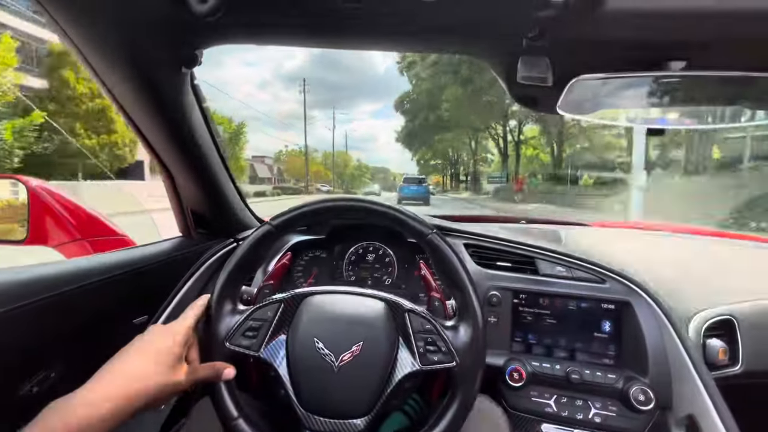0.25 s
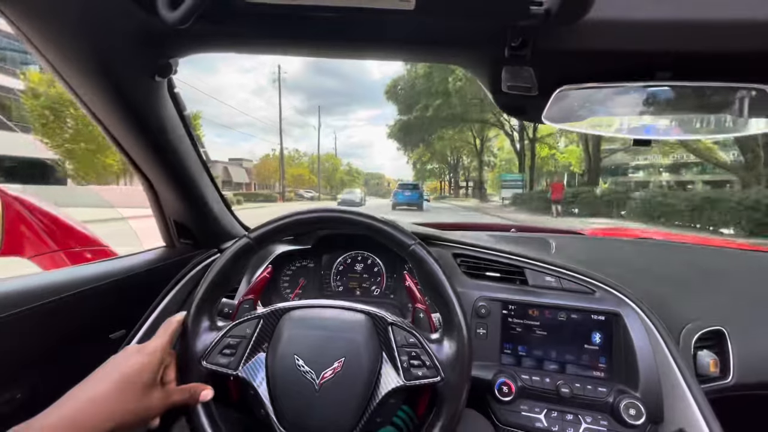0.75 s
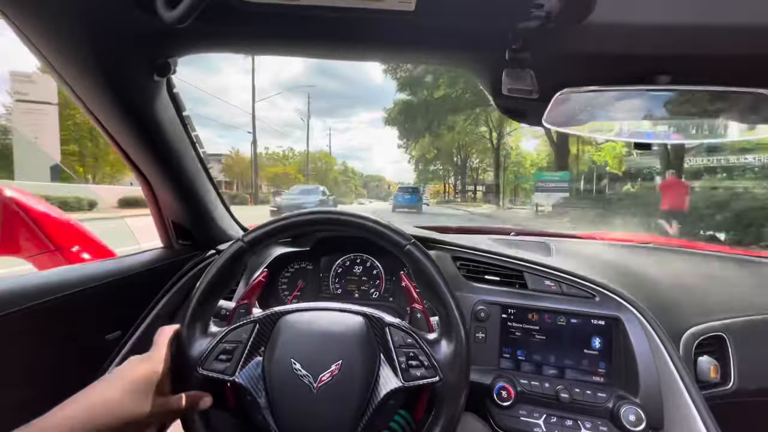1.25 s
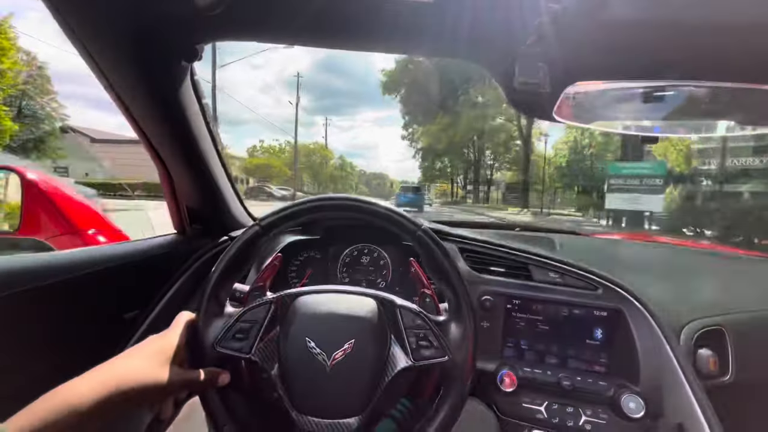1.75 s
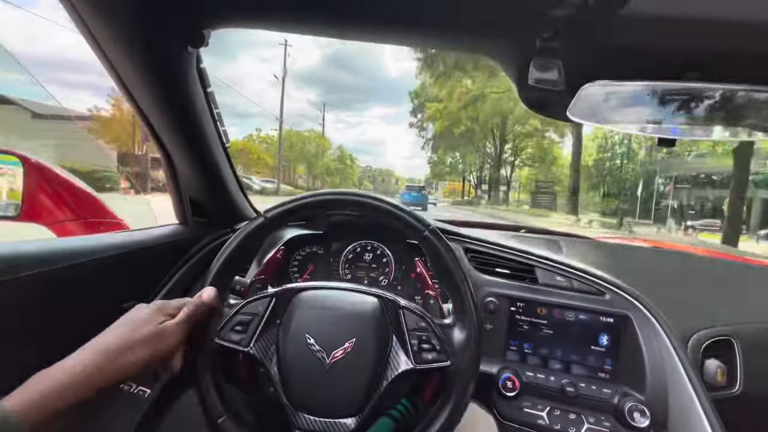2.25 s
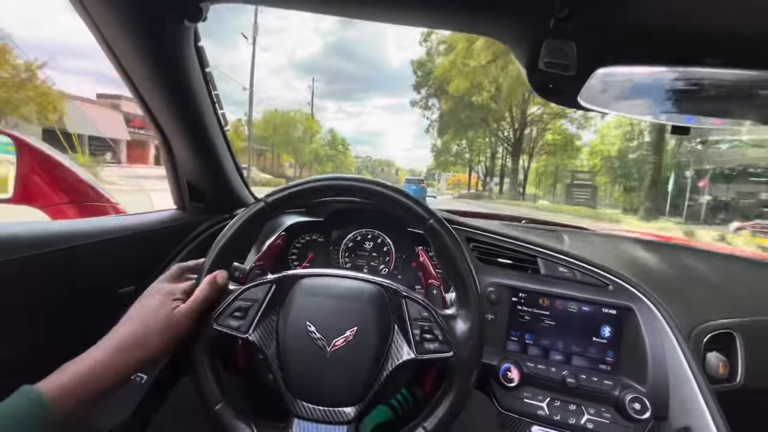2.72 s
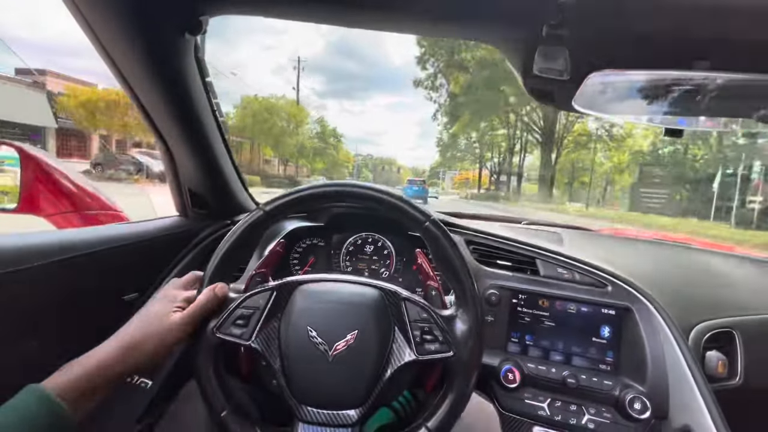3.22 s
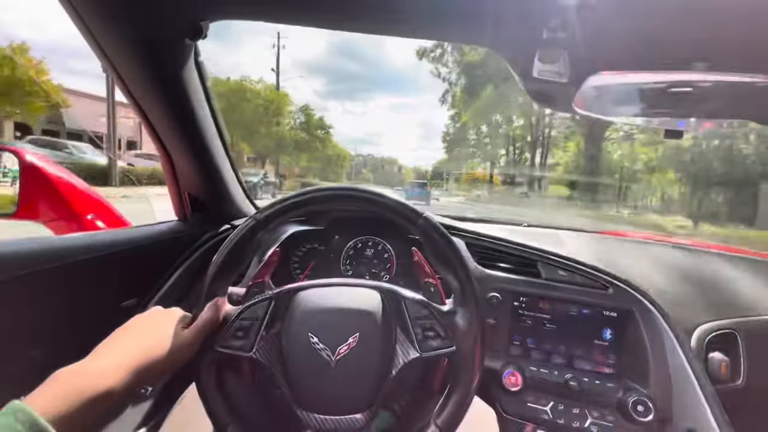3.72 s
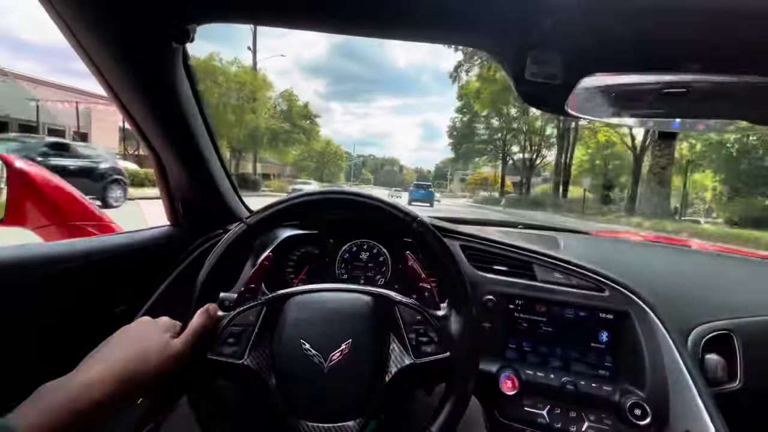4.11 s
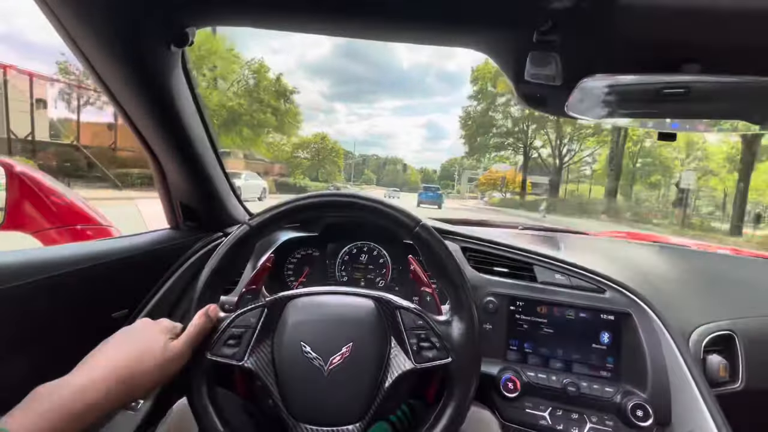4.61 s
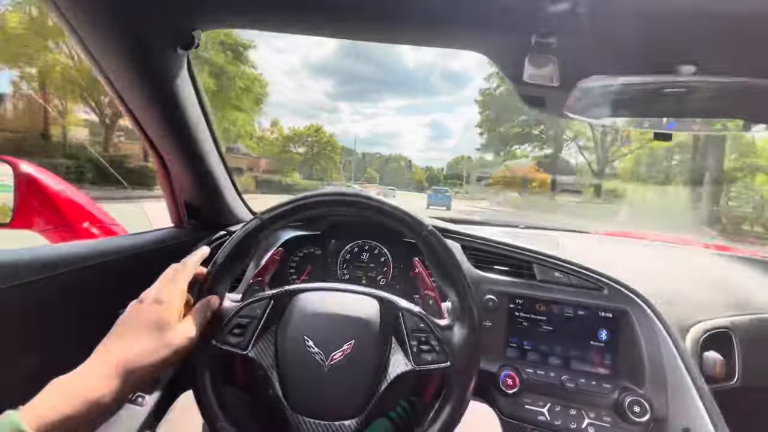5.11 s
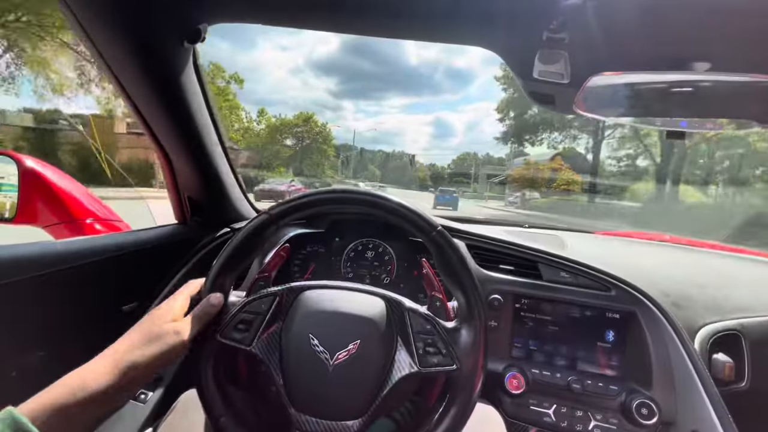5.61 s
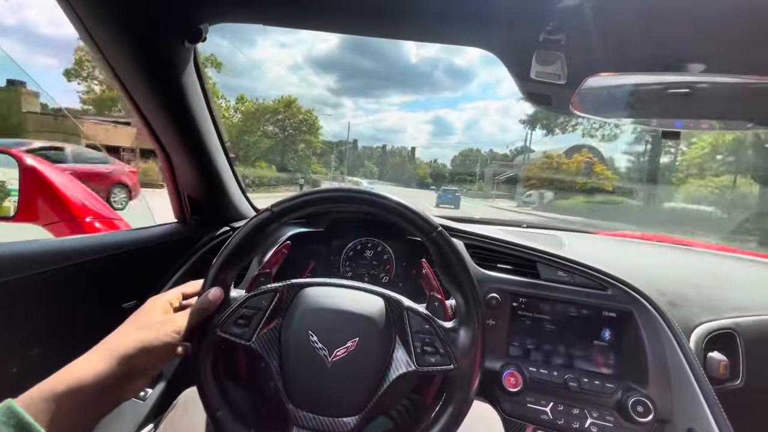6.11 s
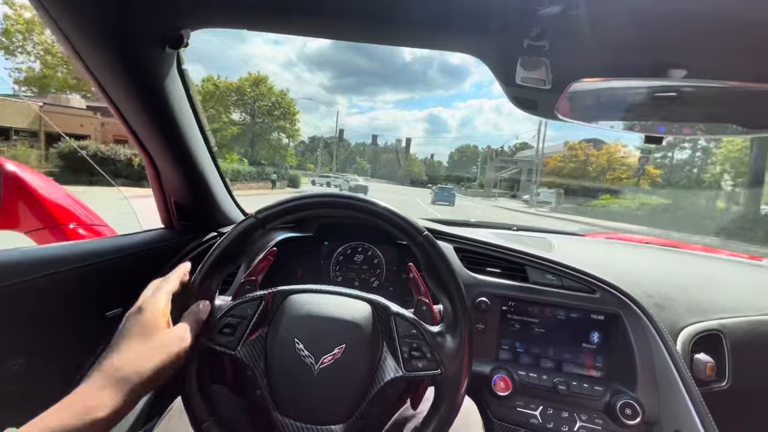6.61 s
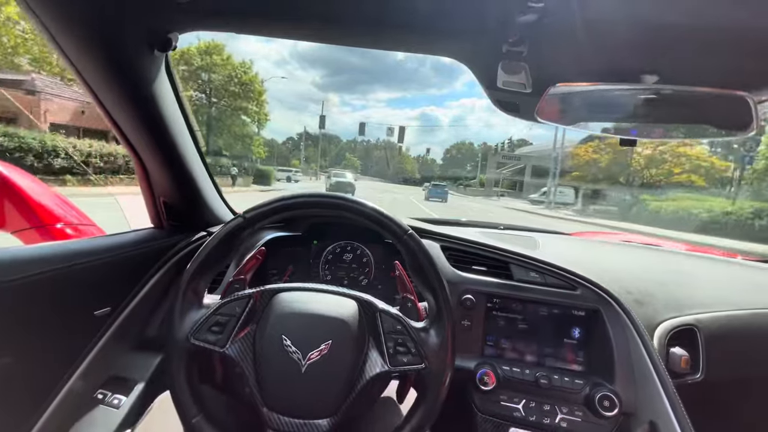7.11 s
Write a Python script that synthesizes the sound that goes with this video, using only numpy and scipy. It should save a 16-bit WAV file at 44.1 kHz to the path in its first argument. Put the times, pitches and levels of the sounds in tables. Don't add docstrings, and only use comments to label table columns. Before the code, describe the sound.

Inside a moving V8 car with loud exhaust: steady low drone, lift-off burble and pops, then a sharp throttle-blip bark near the end.

```python
import sys
import numpy as np
from scipy import signal
from scipy.fft import rfft, irfft
from scipy.io import wavfile
from scipy.ndimage import uniform_filter1d, minimum_filter1d

SR = 44100
rng = np.random.default_rng(int(sys.argv[2]) if len(sys.argv) > 2 else 0)


def gain_from_decibels(decibels):
    exponent = np.asarray(decibels, float) / 20
    return 10 ** exponent


def waveform_to_disk(signal):
    frames = np.transpose(np.atleast_2d(signal))
    scaled = np.clip(frames, -1, 1) * 32767
    samples = np.round(scaled).astype(np.int16)
    wavfile.write(sys.argv[1], SR, samples)


N = 324127
PORT_LEAD, PORT_TOP_HZ = 21, 7800


def level(x, db):
    return x * gain_from_decibels(db) / np.sqrt(np.mean(x ** 2))


def curves(table):
    s, *columns = np.transpose(table)
    return [np.interp(np.arange(N) / SR, s, c) for c in columns]


def lowpass(x, hz, order):
    return signal.sosfilt(signal.butter(order, hz, fs=SR, output="sos"), x)


def band(x, hz, width_hz):
    warm = min(6645, x.shape[-1])
    primed = np.concatenate([x[..., :warm], x], axis=-1)
    return signal.lfilter(*signal.iirpeak(hz, hz / width_hz, fs=SR), primed)[..., warm:]


def walk(rate):
    k = int(SR / rate)
    held = np.repeat(rng.standard_normal(N // k + 1), k)
    return 1.3 * uniform_filter1d(uniform_filter1d(held, k), k)[:N]


def steady(x, span_s, share):
    k = int(span_s * SR)
    power = x.var(axis=0) + x.mean(axis=0) ** 2
    slow_power = uniform_filter1d(uniform_filter1d(power, k), k)
    return x / (slow_power + 0.0091 * x.var()) ** (np.clip(share, 0, 1) / 2)


def noise(colour, flicker_db, rate, turn=0.):
    hz, sum_db, diff_db = np.transpose(colour)
    bins = np.fft.rfftfreq(N, 1 / SR)
    f = np.log(bins + 1)
    both, apart = (
        rfft(rng.standard_normal(N)) * gain_from_decibels(np.interp(f, np.log(hz), db, -99, -99))
        for db in (sum_db, diff_db))
    lead = np.exp(1j * (turn + 2 * np.pi * bins * PORT_LEAD / SR * (bins < PORT_TOP_HZ)))
    left, right = (both + apart) * lead, both - apart
    centres = np.linspace(np.log(hz[0]), np.log(hz[-1]), 5)
    out = 0
    for centre in centres:
        patch = np.clip(1 - abs(f - centre) / (centres[1] - centres[0]), 0, 1)
        out = out + gain_from_decibels(flicker_db * walk(rate)) * irfft([patch * left, patch * right], N)
    return out / np.sqrt(np.mean(out.mean(axis=0) ** 2))


def spells(rows, floor, rise_s, fall_s):
    t = np.arange(N) / SR
    power = floor ** 2
    for s, length, db in rows:
        rise, fall = (t - s) / rise_s + .5, (s + length - t) / fall_s + .5
        power = power + (gain_from_decibels(db) * np.clip(np.minimum(rise, fall), 0, 1)) ** 2
    return np.sqrt(power)


def burst(s, t60, rise_s):
    i = int(s * SR)
    t = np.arange(min(int(.15 * SR), N - i)) / SR
    return i, (1 - np.exp(-t / rise_s)) * 1000. ** (-t / max(t60, .01))


def pan(db, pan_db):
    return gain_from_decibels(db + np.array([[pan_db], [-pan_db]]) / 2)


# pitch_hz, ear_sum_db per Hz, ear_difference_db per Hz
RUMBLE_COLOUR = [(14, -33, -47), (24, -19.5, -29), (40, -4.5, -22), (56.7, 3.5, -24), (70, -44, -23),
                 (110, -20, -26)]
ROAR_COLOUR = [(294, 2, -20), (472, 10.5, -9.5), (690, 0.5, -1.5), (1104, -0.5, -3.5), (1384, -7, -11.5),
               (1633, -10.5, -11), (2100, -27.5, -23), (2610, -34.5, -37.5)]
HISS_COLOUR = [(1660, 1, -7), (2200, 4, 1), (3200, -2, -1.5), (4200, -9, -4.5), (4940, -31.5, -24)]
SWISH_COLOUR = [(3620, -5.5, -17), (4500, -2.5, -5.5), (5720, 0, -3.5), (6750, -8.5, -6),
                (8260, -11.5, -12), (8900, -5, -14), (9640, -12, -3), (9750, -28, -2), (10200, -26, -1),
                (10930, -11, -7.5), (11200, -12.5, -15), (12000, -14.5, -24.5), (12250, -16, -25.5),
                (12500, -44.5, -47.5)]
# closest_s, width_s, level_db, brightness_db
SWELLS = [(.15, 0.052, -83, 2), (0.951, 0.28, -54.5, -8), (1.84, 0.1, -49.5, -1.5), (1.7, 0.5, -57.5, -5),
          (2.49, 0.11, -42, -7), (2.68, 0.19, -51.5, -6), (3.8, 0.15, -55.5, -15), (4.15, 0.17, -53.5, -6),
          (4.9, 0.36, -56.5, -5.5), (6.2, 0.29, -52, -16.5), (6.84, 0.12, -49.5, -3.5),
          (6.97, 0.06, -44.5, -8), (7.09, 0.057, -55, 4.5)]
# start_s, length_s, level_db
BUMPS = [
    (0, 0.27, -17),
    (.72, 0.56, -22),
    (1.46, 0.1, -22),
    (2.37, 0.37, -15.5),
    (5.2, 0.14, -21),
    (5.52, 0.089, -18),
    (5.9, 0.13, -23),
    (6.53, 0.12, -19),
]


def road():
    t = np.arange(N) / SR
    coast_from_s, brake_from_s, brake_fade = 1.4, 5.76, 6.5
    slowing = np.maximum(t - coast_from_s, 0) + brake_fade * np.maximum(t - brake_from_s, 0)
    near = np.array([gain_from_decibels(db) * np.exp(-.5 * ((t - s) / width) ** 2) for s, width, db, _ in SWELLS])
    swelling = np.sqrt(np.sum(near ** 2, axis=0))
    bright = np.sqrt(gain_from_decibels(2 * np.array(SWELLS)[:, 3]) @ near ** 2)

    bumps = spells(BUMPS, gain_from_decibels(-22.5 - .5 * slowing), rise_s=.04, fall_s=.08)
    body = steady(noise(RUMBLE_COLOUR, flicker_db=.6, rate=8, turn=-.75), span_s=.12, share=.8)
    rumble = gain_from_decibels(-2.2) * bumps * body
    roar_gain = np.hypot(gain_from_decibels(-31 - 0.55 * slowing), gain_from_decibels(13) * swelling)
    roar = roar_gain * noise(ROAR_COLOUR, flicker_db=1.36, rate=22, turn=0.88)
    hiss = np.hypot(gain_from_decibels(-57.5), swelling) * noise(HISS_COLOUR, flicker_db=1.6, rate=21)
    swish = np.hypot(gain_from_decibels(-61), bright) * noise(SWISH_COLOUR, flicker_db=0.1, rate=16)
    return rumble + roar + hiss + swish


# start_s, peak_db, pitch_hz
SQUEAKS = [(2.463, -24, 1158), (2.488, -41, 3740), (2.586, -41, 3000), (2.603, -21, 1400),
           (2.562, -14, 514), (4.074, -40, 3244), (4.457, -45, 2450), (4.843, -52, 5200),
           (5.208, -42, 2495), (5.589, -51, 5280), (6.342, -48, 5327), (7.088, -43, 3290)]


def squeaks():
    out = np.zeros(N)
    for s, db, hz in SQUEAKS:
        i, env = burst(s, t60=.06, rise_s=.004)
        out[i:i + len(env)] += 2 * gain_from_decibels(db) * env * np.sin(2 * np.pi * hz * np.arange(len(env)) / SR)
    return np.array([gain_from_decibels(-3) * out, out])


# start_s, peak_db
CHATTER = [(0.038, -53), (.681, -50), (.734, -51), (0.782, -42.5), (.831, -44), (.884, -41.5), (.941, -50),
           (2.373, -46.5), (2.419, -50.5), (2.49, -52), (2.536, -39), (2.602, -36), (4.592, -51),
           (5.197, -51), (5.246, -49), (5.337, -50), (5.388, -47.5), (5.437, -47), (5.583, -49)]
# start_s, peak_db, brightness_db, left_minus_right_db
KNOCKS = [(1.164, -50, -21, -4), (1.206, -47, -11, -7), (2.444, -47, -8, -5), (2.757, -54, -11, 1),
          (3.237, -47.5, 6, -0.5), (3.249, -32, 4, 1), (3.267, -52.5, 7, -4), (3.707, -47, -18, 3),
          (3.859, -56, -7, -7), (4.11, -48.5, -2, -6.5), (4.456, -47.5, -20, 0), (4.666, -52, -21, 8),
          (4.734, -47, -8, -8), (4.836, -48, -4, -3), (4.915, -54, -18, -3), (5.093, -49, -15, 2.5),
          (5.958, -42.5, 5.5, 3.5), (6.062, -32, -9.5, -1), (6.072, -43.5, -18, -2), (6.334, -43, -14, -2),
          (6.589, -56, -2, -6), (6.62, -56.5, -6, -17), (6.715, -46, -17, -11), (7.091, -45, -23, -2)]


def ticks():
    rise_s = .003
    low = noise(HISS_COLOUR, flicker_db=1, rate=38)
    swish = noise(SWISH_COLOUR, flicker_db=1, rate=30)
    mid, top = (
        level(signal.sosfilt(signal.butter(4, PORT_TOP_HZ, kind, fs=SR, output="sos"), swish), 0)
        for kind in ("low", "high"))
    low = low + 0.8 * band(low, 3280, width_hz=230)

    # start, peak, mid dB, top dB, t60, left minus right dB
    rows = [(s, db, 1, -16, .05, -1) for s, db in CHATTER]
    rows += [(s, db, -3 + 0.47 * top_db, top_db, 0.048, pan_db) for s, db, top_db, pan_db in KNOCKS]
    out = np.zeros((2, N))
    for s, db, mid_db, top_db, t60, pan_db in rows:
        i, env = burst(s - rise_s / 2, t60, rise_s)
        span = slice(i, i + len(env))
        scratch = low[:, span] + gain_from_decibels(mid_db) * mid[:, span] + gain_from_decibels(top_db - 5.5) * top[:, span]
        out[:, span] += pan(db + 8.5, pan_db) * env * scratch
    return out


# start_s, length_s, level_db
OPEN_THROTTLE = [
    (6.71, 0.11, -22),
    (6.86, 0.026, -41),
    (6.91, 0.13, -31.5),
]


def blast():
    gain = spells(OPEN_THROTTLE, 0, rise_s=0.026, fall_s=.05)
    return gain * noise(ROAR_COLOUR, flicker_db=6, rate=67)


# start_s, peak_db, pitch_hz, left_minus_right_db
CRACKS = [(2.562, -18.5, 535, -5), (2.605, -17.5, 571, -4), (2.686, -17.5, 611, 13), (3.248, -21.5, 640, 6),
          (3.73, -13.5, 526, -3), (4.336, -22, 560, -3), (4.777, -19.5, 490, -0.5), (4.966, -18.5, 830, -1),
          (5.076, -29, 770, 3), (5.328, -26, 760, 7), (6.721, -20, 606, 8.5), (6.871, -28.5, 501, 3),
          (6.98, -24, 1050, -3)]


def cracks():
    out = np.zeros((2, N))
    for s, db, hz, pan_db in CRACKS:
        i, env = burst(s, t60=.11, rise_s=.001)
        pop = level(band(rng.standard_normal((2, len(env))), 0.68 * hz, hz), 0)
        out[:, i:i + len(env)] += pan(db + 1.0, pan_db) * env * pop
    return lowpass(out, 1500, order=4)


# start_s, length_s, level_db
LONG_FLAMES = [(2.424, 0.32, -18.5), (2.835, 0.057, -16.5), (3.298, .32, -14.5), (3.858, .12, -15),
               (4.028, 0.15, -16), (4.385, 0.54, -18.5), (4.9, .6, -15), (5.678, 0.24, -16.5),
               (5.982, 0.14, -18.5), (6.42, .2, -16), (6.912, 0.12, -21), (7.198, 0.13, -14.5)]
SHORT_FLAMES = [(2.3, 0.59, -14.5), (2.88, 0.12, -11.5), (3.06, .19, -13.5), (3.3, 0.25, -17),
                (3.66, .14, -9.5), (3.95, .2, -12.5), (4.2, .2, -13), (4.55, 0.22, -11.5), (4.81, 0.11, -9),
                (5.1, .4, -18), (5.55, 0.22, -12), (5.85, 0.31, -15.5), (6.2, 0.247, -12.5),
                (7.27, 0.11, -19)]
SMOULDER_DB = [-21, -20.5, -21.5, -36]


def flames(overrun):
    floors = [gain_from_decibels(db - 11 * (1 - overrun)) for db in SMOULDER_DB]
    rings = [[(s, .05, db + ring_db) for s, db, _, _ in CRACKS] for ring_db in (-1, -8)]
    groups = [LONG_FLAMES, SHORT_FLAMES, *rings]
    return [spells(rows, floor, rise_s=0.037, fall_s=0.014) for rows, floor in zip(groups, floors)]


def ears(right, left_db, sign):
    lag = 20
    return np.array([sign * gain_from_decibels(left_db) * np.roll(right, lag), right])


def pulses(hz, sizes):
    turns = np.cumsum(hz) / SR
    at = np.interp(np.arange(1, int(turns[-1])), turns, np.arange(N))
    i = at.astype(int)
    out = np.zeros(N + 1)
    size = sizes[:len(i)]
    out[i] += size * (1 - at + i)
    out[i + 1] += size * (at - i)
    return out[:N], i


# time_s, firing_rate_hz, overrun 0-1 (throttle shut), firing_level_db
ENGINE = [(0, 158.6, 0, -13), (.9, 163.6, 0.06, -13), (1.4, 160.3, 0.01, -14), (2.0, 157, 0.03, -12.5),
          (2.25, 153.8, 0.9, -12.5), (2.75, 144.5, .8, -16), (3.3, 137.8, 1, -21.5), (4.2, 131.2, 1, -23),
          (6.55, 117.1, 0.85, -19), (6.64, 121.7, 0.3, -15.5), (6.7, 140.8, 0, -12.5),
          (6.75, 151.6, .1, -6), (6.8, 163.3, 0, -1), (6.86, 178.4, 0.2, -9.5), (6.93, 191.6, 0.8, 0),
          (7.0, 197.7, 0.9, -8.5), (7.1, 203, 0.9, -18.5), (7.35, 197.1, 1, -22)]
CYLINDERS_DB = [-2.5, -5, 7.5, -2.5, -5, -.5, 1, -.5]
# pitch_hz, width_hz, firing_level_db, left_ear_db, left_ear_sign, polarity
PIPE = [(40.7, 42, -9, -6.5, 0.18, 1), (87.34, 10.3, 6.5, 1.5, 0.46, -1.38), (115, 21.4, 2, -6.5, 1, 1),
        (142.7, 17.34, 4.5, -1.5, 0.6, -1.734), (204.5, 13.2, 2.5, -9, 1, -0.92),
        (278, 20, -9.5, -3.5, 0.93, 0.81), (312.3, 13, -18.5, -34, 0.76, -1.4),
        (372.6, 45, -9.5, -5.5, -1.4, 0.82), (458, 150, -25, -11, 1, -1.7), (556, 110, -27, 0, -1.4, -0.7),
        (760, 950, -9.5, -2, 0.94, -0.31)]
BURBLE_GROUP = [-1, 0, 1, 1, 2, 2, 2, 3, 3, 3, -1]
BURBLE_DB = [0, 0, -12, -6, -0.5, -6, -9, 11, -13.5, 3.5, 0]
# pitch_hz, ear_sum_db per Hz, ear_difference_db per Hz
RASP_COLOUR = [(344, 0, -9), (700, 3.5, 4.5), (1290, -14, -8), (2500, -24.5, -24), (3970, -31.5, -32)]


def exhaust():
    hz, overrun, load_db = curves(ENGINE)
    overrun = np.clip(overrun, 0, 1)
    climb = uniform_filter1d(np.maximum(np.gradient(hz) * SR, 0), size=2205)
    imbalance = (1 - 0.82 * overrun) * np.exp(-(climb / 150) ** 2)
    scatter_db = 0.86 + 2.5 * overrun
    chance = rng.standard_normal((N // 100, 2)).T

    flare, at = pulses(hz, chance[1] * abs(chance[1]) ** .6)
    cylinder_db = imbalance[at] * np.resize(CYLINDERS_DB, len(at))
    sizes = gain_from_decibels(cylinder_db + scatter_db[at] * chance[0, :len(at)])
    wobble = 1 + .005 * scatter_db * walk(90)
    clicks = pulses(hz * wobble, np.append(sizes, sizes))[0]
    fire = clicks * gain_from_decibels(load_db) * SR / hz
    fire = lowpass(lowpass(fire, 230, order=2), 1300, order=4)

    firing, groups = 0, np.zeros((4, 2, N))
    for k, (f, width, db, left_db, sign, polarity) in enumerate(PIPE):
        firing = firing + polarity * gain_from_decibels(db) * ears(band(fire, f, width), left_db, sign)
        if BURBLE_GROUP[k] >= 0:
            ringing = band(band(flare, f, width), f, 1.7 * width)
            groups[BURBLE_GROUP[k]] += level(ears(ringing, left_db, sign), BURBLE_DB[k])
    burble = sum(
        gain * level(steady(group, span_s=0.076, share=0.85), 4.97)
        for group, gain in zip(groups, flames(overrun)))

    squared = firing ** 2
    steep = .3 * (squared - lowpass(squared, 190, order=2))
    rasp_gain = gain_from_decibels(-24.5) * (squared + 0.46 * burble ** 2)
    rasp = rasp_gain * noise(RASP_COLOUR, flicker_db=2.5, rate=25)
    return firing + steep + rasp + burble


def scene():
    return road() + squeaks() + ticks() + blast() + cracks() + exhaust()


def roll_off(x):
    return signal.sosfilt(signal.butter(12, 13000, fs=SR, output="sos"), x)


def record(dry):
    peak = -minimum_filter1d(-abs(dry).max(axis=0), size=661)
    gain = uniform_filter1d(np.minimum(1, .85 / peak) ** .85, size=661)
    held = dry * gain
    held = held / (1 + abs(held) ** 8) ** (1 / 8)
    return roll_off(held)


dry = scene()
out = record(dry)
waveform_to_disk(out)
```